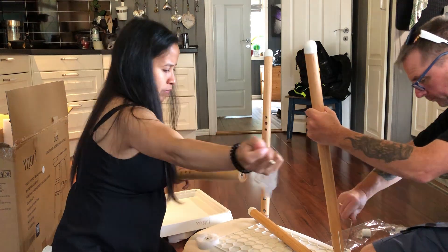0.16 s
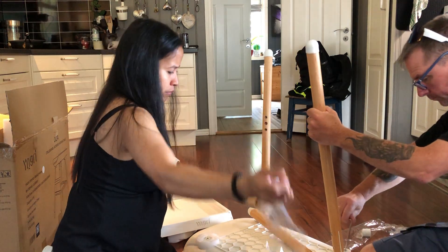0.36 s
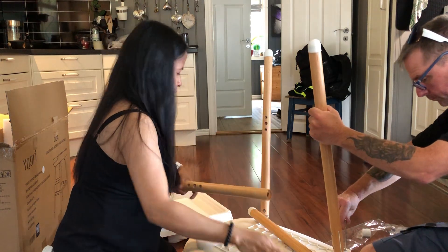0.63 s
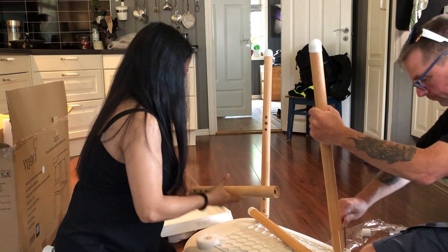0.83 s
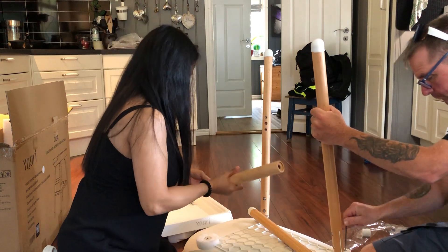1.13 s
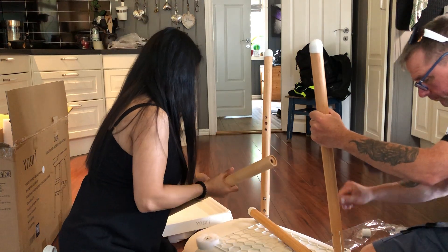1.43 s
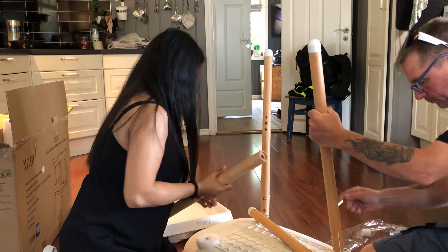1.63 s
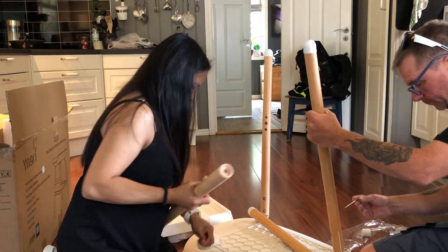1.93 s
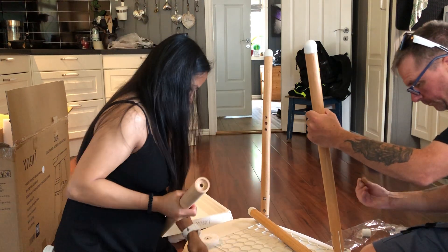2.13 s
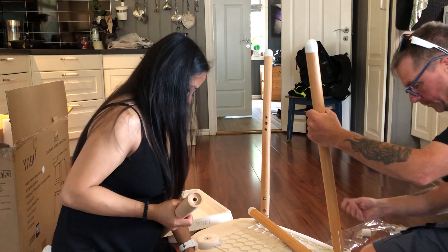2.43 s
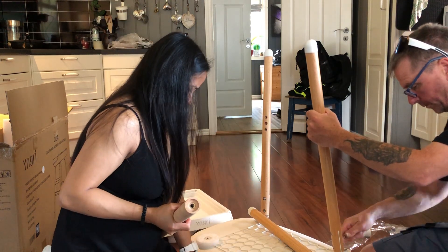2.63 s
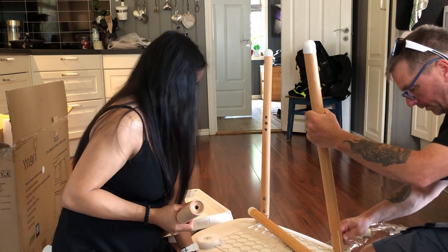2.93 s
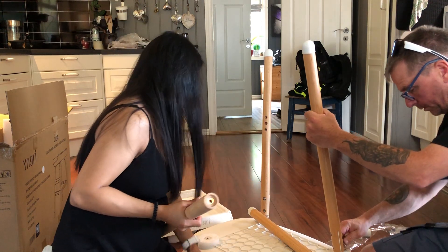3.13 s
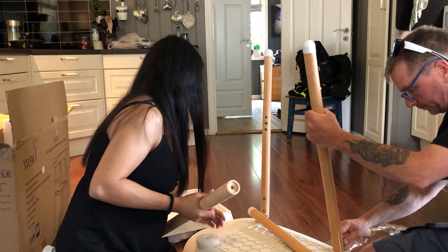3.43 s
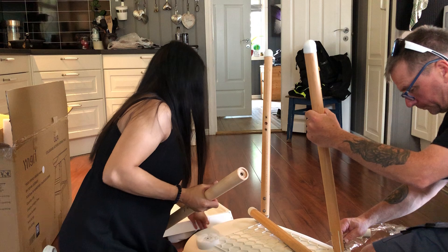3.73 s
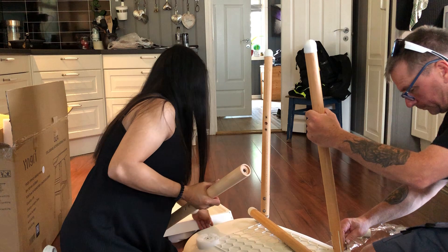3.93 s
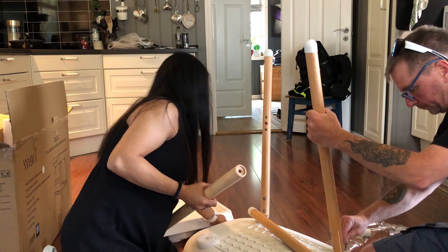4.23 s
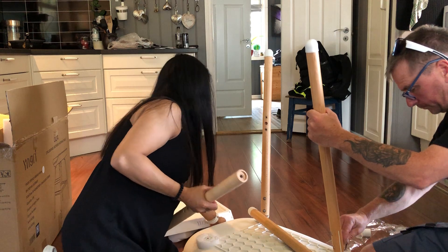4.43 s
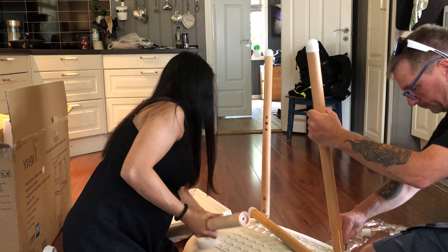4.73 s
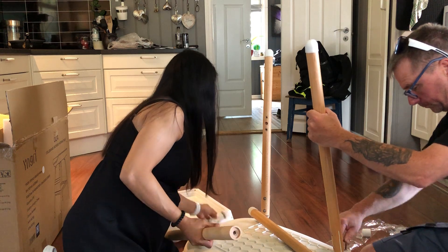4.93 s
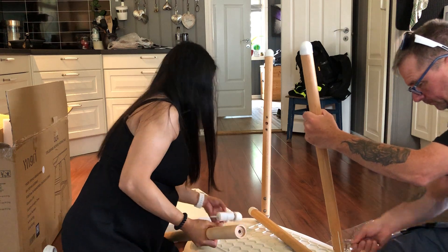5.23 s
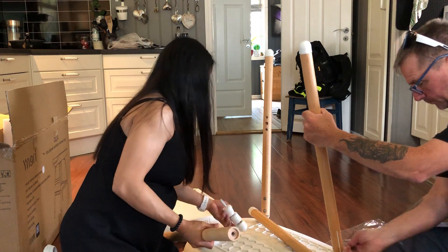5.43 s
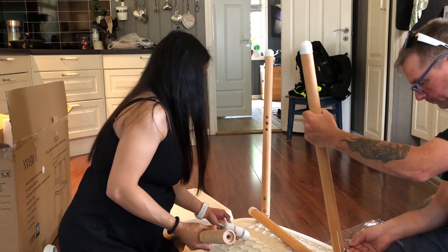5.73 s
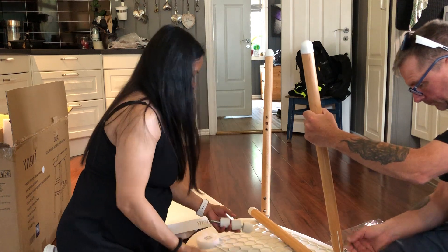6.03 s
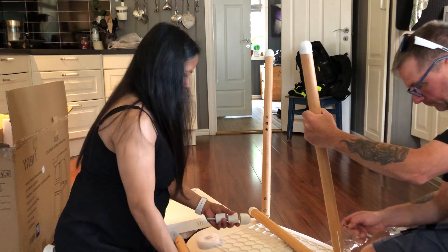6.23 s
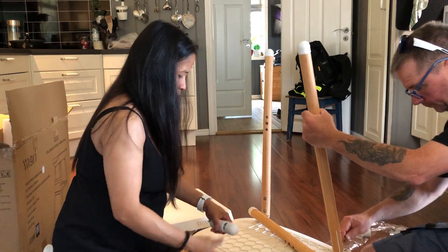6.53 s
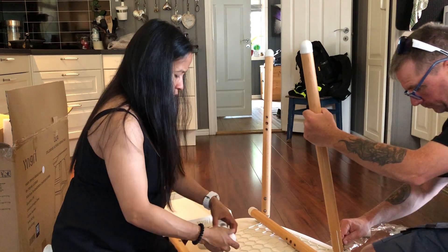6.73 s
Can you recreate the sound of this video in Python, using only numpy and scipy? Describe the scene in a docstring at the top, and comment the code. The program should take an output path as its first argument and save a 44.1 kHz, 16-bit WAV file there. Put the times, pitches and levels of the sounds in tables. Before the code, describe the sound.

A quiet kitchen with a very faint low hum and short, lively room reverberation, heard closely. From 0 to 0.9 seconds thin plastic wrap rustles brightly with dense sharp clicks and dry ticks, strongest in the first 0.6, as it is pulled off and dropped. From 1 to 2.5 only soft bumps and sparse small clicks remain. Between 2.4 and 3.2 little parts click in a quick cluster over faint film rustle. Hollow plastic caps tap in a tray at 3.4, 3.7 and 4.0. Near 4.4 a wooden rod knocks lightly and slides until about 4.8, with soft bumps. Small clicks continue; around 5.5 fingers briefly rub a cap, and a deep, dull bump lands at 5.6. A cap strikes the laminate floor loudly at 6.1, then bounces at 6.45, 6.63, 6.74 and 6.82, quickening and weakening among renewed film crackle and fine ticks.

```python
"""Film rustles at once and clicks as plastic wrap is pulled off and dropped in a quiet, faintly humming kitchen.
Soft bumps follow; plastic caps tap in a tray, a wooden rod knocks and slides, fingers rub a cap, and a cap
falls on the laminate floor and bounces. Clicks, ticks, taps and knocks are coloured noise bursts with echoes
and a room wash; bumps are sagging sines with rumble; rustle, slide and rub are streams of random snaps."""
import sys
import numpy as np
from scipy import signal
from scipy.fft import rfft, irfft, next_fast_len
from scipy.io import wavfile
from scipy.ndimage import map_coordinates

SR = 44100
rng = np.random.default_rng(int(sys.argv[2]) if len(sys.argv) > 2 else 0)


def generate_wav(sig):
    """Save sig (samples, or channels by samples) to the path in sys.argv[1] as 16-bit PCM at SR."""
    pcm = np.round(np.clip(np.atleast_2d(sig).T, -1, 1) * 32767).astype(np.int16)
    wavfile.write(sys.argv[1], SR, pcm)


N = 302967
TAIL = SR // 3  # samples of each impact and room answer


def amp(db):
    """Decibels to amplitude factor."""
    return 10 ** (np.asarray(db) / 20)


def unit(x):
    """Scale to RMS 1."""
    return x / np.sqrt(np.mean(x ** 2) + 1e-20)


def along(points, hz):
    """Interpolate (Hz, value) points on a log frequency axis."""
    f, v = np.transpose(points)
    return np.interp(np.log(hz + 1), np.log(f + 1), v)


def gain(*spans):
    """Level curves in dB as a gain per sample, silent outside their spans."""
    t = np.arange(N) / SR
    return sum(amp(np.interp(t, *np.transpose(rows), left=-200, right=-200)) for rows in spans)


def strokes(rows):
    """Each stroke sets in quickly, holds its level and fades."""
    t, attack_s = np.arange(N) / SR, 0.015
    track = np.zeros(N)
    for s, db, hold_s, fade_db_per_s in rows:
        attack = np.clip((t - s) / attack_s, 0, 1)
        track += attack * amp(db - fade_db_per_s * np.maximum(t - s - hold_s, 0))
    return track


def wobble(rate_hz):
    """Smooth random curve with rate_hz knots a second."""
    knots = rng.standard_normal(int(N * rate_hz / SR) + 4)
    return map_coordinates(knots, [np.arange(N) * rate_hz / SR])


def coloured(x, db_at):
    """Filter x with a gain in dB for each frequency."""
    m = next_fast_len(len(x) + 4096)
    return irfft(rfft(x, m) * amp(db_at(np.fft.rfftfreq(m, 1 / SR))), m)[:len(x)]


def causal(x, db_at):
    """Minimum-phase filter with this gain: nothing sounds before the blow."""
    m = 8192  # x is cut to this length
    log_gain = np.log(amp(db_at(np.fft.rfftfreq(m, 1 / SR))) + 1e-6)
    cepstrum = irfft(log_gain, m)
    cepstrum[1:m // 2] *= 2
    cepstrum[m // 2 + 1:] = 0
    return irfft(rfft(x, m) * np.exp(rfft(cepstrum)), m)


# Decay of the room. Each row: frequency in Hz, t60 in seconds.
ROOM_DECAY = [(100, 0.42), (300, 0.34), (1000, 0.43), (5000, 0.37), (13000, 0.28)]


def reverb(noise):
    """Noise of which each frequency dies at the room's own speed."""
    hz, t, z = signal.stft(noise, SR, nperseg=256)
    decay = amp(-60 * t / along(ROOM_DECAY, hz)[:, None])
    return signal.istft(z * decay, SR, nperseg=256)[1][:TAIL]


def in_room(x, wet_db):
    """A running sound plus the room's answer to it."""
    tail = reverb(rng.standard_normal(TAIL))
    tail = tail / np.linalg.norm(tail)
    delayed = np.pad(x, (150, 0))
    return x + amp(wet_db) * signal.fftconvolve(delayed, tail)[:N]


# First echoes, before random spread. Each row: delay in seconds, level in dB.
FIRST_ECHOES = [(.0018, -5.5), (.0065, -10), (0.014, -22), (0.016, -20.5), (.024, -38), (0.032, -27.5),
                (0.045, -32)]


def strike(db_at, crack_s, wet_db, fill_s, thin_hz=900):
    """A short coloured crack of peak 1, its first echoes and the room filling up behind it."""
    t, noise = np.arange(TAIL) / SR, rng.standard_normal((2, TAIL))
    noise[0, 0] = 4  # strong first contact
    # the bass builds up only in the room
    thin = lambda hz: db_at(hz) - 10 * np.log10(1 + (thin_hz / (hz + 1)) ** 2)
    crack = causal(noise[0] * amp(-60 * t / crack_s), thin)
    crack = np.pad(crack, (0, TAIL - len(crack))) / np.abs(crack).max()
    echoes = np.zeros(TAIL)
    for delay_s, db in FIRST_ECHOES:
        level = amp(db + rng.normal(0, 3))
        echoes += level * np.roll(crack, round(delay_s * rng.normal(1, .1) * SR))
    wash = (1 - np.exp(-t / fill_s)) * reverb(unit(coloured(noise[1], db_at)))
    return crack + echoes + amp(wet_db) * wash


def add(track, s, sound):
    """Mix a sound in at s seconds."""
    track[round(s * SR):][:len(sound)] += sound


def grains(per_s, spread_db, clump_db):
    """Random tiny snaps, a few of them large, coming in clumps."""
    draw = rng.random((3, N))
    size = amp(-spread_db * np.log(draw[1] + 0.0047) + clump_db * wobble(40))
    return unit((draw[0] < per_s / SR) * size * np.sign(draw[2] - .5))


# Handling of the film, one list per span. Each row: time in seconds, rustle in dB.
RUSTLE_LEVELS = [
    [(0.0, -39.5), (0.112, -55), (0.522, -48.5), (0.79, -58), (0.964, -91)],
    [(1.35, -68), (1.43, -68), (1.5, -108)],
    [(2.4, -71), (2.5, -68.5), (2.872, -62), (2.992, -63.5), (3.35, -88)],
    [(6.0, -69), (6.25, -57.5), (6.318, -61.5), (6.44, -45), (6.56, -54), (6.65, -52), (6.87, -52)],
]
# Colour of the film. Each row: frequency in Hz, gain in dB.
FILM_COLOUR = [(88, -43), (150, 14), (348, -1), (457, 5.5), (589, -20), (689, -7), (3100, 2), (15100, -12),
               (16000, -3.5)]
# Large to tiny folds. Each row: centre in Hz, level in dB.
FOLD_SIZES = [(900, 5.5), (3500, 1), (8000, 1), (13000, 2.5)]


def film():
    """Thin film buckles in many creases; each size of fold snaps in its own band."""
    crackle = np.zeros(N)
    for fold_hz, db in FOLD_SIZES:
        band = lambda hz: along(FILM_COLOUR, hz) - 14 * np.log((hz + 1) / fold_hz) ** 2
        crackle += amp(db) * coloured(grains(300, spread_db=4, clump_db=3.0), band)
    return in_room(gain(*RUSTLE_LEVELS) * unit(crackle), wet_db=-1.0)


# Colour of the room tone. Each row: frequency in Hz, gain in dB.
HUSH_COLOUR = [(18, -37), (30, 2), (53, -2), (210, -0.5), (295, -2.5), (364, -3.5), (988, -9.5),
               (1910, -17.5), (6900, -20.5), (12300, -23), (14800, -23), (16000, -14)]
HUM_HZ = 50


def room_tone():
    """Faint noise that drifts a little, and a mains hum sine."""
    hush = unit(coloured(rng.standard_normal(N), lambda hz: along(HUSH_COLOUR, hz)))
    hum = np.sin(2 * np.pi * HUM_HZ * np.arange(N) / SR)
    drift_db = 1.0 * wobble(3.9) + 0.13 * wobble(14.0)
    return amp(-67 + drift_db) * hush + amp(-65.5) * hum


# Creases of the wrap and small parts clicking. Each row: start in seconds, crack peak in dB,
# ring in Hz, body in dB, air in dB, wash under the crack in dB.
CLICK_EVENTS = [(.0034, -20, 3250, -16, -10.5, -12.5), (0.1164, -9.5, 3640, -23.5, -20, -22.5),
                (0.1226, -11.5, 3160, -13.5, -9, -18), (.1519, -10.5, 6550, -29, -11, -23),
                (0.2068, -29, 4650, -37, -21, -16), (.325, -23, 8300, -27, -18.5, -17.5),
                (0.3471, -20, 6150, -21, -11.5, -14.5), (0.4081, -25, 5270, -14.5, -10, -14),
                (0.4686, -19, 4150, -19, -17.5, -20), (0.537, -27.5, 2920, -25, -2, -12),
                (0.5577, -22.5, 3920, -24, -14.5, -15), (0.5877, -18, 2920, -23.5, -16, -11.5),
                (0.6118, -13, 10800, -19.5, -24.5, -24.5), (.781, -30.5, 4440, -22, -14, -19.5),
                (0.8122, -26.5, 3300, -22, -18, -14.5), (0.8852, -37, 3730, -8.5, -24, -16),
                (.946, -37.5, 3760, -33, -19, -24.5), (1.2331, -56, 2870, -5, -42, -9),
                (1.348, -45.5, 1000, 4, -29, -12.5), (1.5346, -46, 2670, -12, -17, -24),
                (1.556, -32, 3350, -14.5, -12.5, -23), (1.7958, -49.5, 2300, -1, -15, -16.5),
                (1.952, -27, 14100, -16.5, -13.5, -19.5), (2.0597, -31.5, 6640, -10, -15.5, -25),
                (2.363, -49.5, 5700, -30, -15, -25), (2.4334, -31, 4800, -15, -18, -24.5),
                (2.5916, -43.5, 6100, -3, -25, -14.5), (2.673, -24, 3530, 2, -16.5, -25),
                (2.76, -46.5, 1595, -1, -17, -9), (2.791, -34.5, 2440, -12, -22, -13.5),
                (2.826, -25, 2270, -11.5, -15, -18.5), (2.8932, -25, 3340, -13.5, -24.5, -23.5),
                (2.9258, -29, 4640, -6.5, -13, -20.5), (2.9493, -37, 1680, -0.5, -26, -19.5),
                (3.0016, -41, 4150, -28, -24, -23), (3.019, -31.5, 1570, -5, -18.5, -20),
                (3.0392, -32.5, 6800, -8, -20, -19.5), (3.0757, -34, 3840, -18, -12, -23),
                (3.141, -31.5, 6840, -3, -11.5, -22.5), (3.2495, -54.5, 1540, -19, -21, -6),
                (4.1812, -41, 7100, -1, -12, -21), (4.2279, -26, 7700, -12.5, -14.5, -25),
                (4.31, -46, 2540, -5, -32, -14.5), (4.4467, -43.5, 1630, -9, -44, -5),
                (4.6426, -45, 1510, -7, -17, -14.5), (4.9127, -48, 4260, -12, -29.5, -18.5),
                (5.1278, -49.5, 2250, -10, -29, -16.5), (5.312, -30, 6200, -14, -12, -20.5),
                (5.3429, -38, 1700, -17.5, -66, -11.5), (5.4657, -46, 2060, -7, -48, -12.5),
                (5.5899, -46.5, 2210, -21, -43, -9.5), (6.0086, -37, 3930, -9, -18, -12.5),
                (6.2878, -29, 2830, -16, -23.5, -22.5), (6.328, -23, 5640, -5.5, -10, -24)]
RING_DB, RING_PER_AIR_DB = 1, -0.19  # hump at the ring; dull clicks ring more


def clicks():
    """Each click is broad, with a hump at its ring, some body, some air and a ragged colour of its own."""
    track = np.zeros(N + SR)
    for s, db, ring_hz, body_db, air_db, wet_db in CLICK_EVENTS:
        slope = [(120, body_db - 9), (700, body_db), (1300, body_db / 2 - 6.5),
                 (2000, -16.5), (3200, -15), (12000, air_db)]
        ragged_db = 2.5 * rng.standard_normal(size=18)  # one knot per kHz
        ring_db = RING_DB + RING_PER_AIR_DB * air_db
        hump = lambda hz: ring_db * np.exp(-(np.log((hz + 1) / ring_hz) / 0.19) ** 2)
        ragged = lambda hz: np.interp(hz / 1000, np.arange(len(ragged_db)), ragged_db)
        colour = lambda hz: along(slope, hz) + hump(hz) + ragged(hz)
        add(track, s, amp(db) * strike(colour, crack_s=0.0075, wet_db=wet_db, fill_s=0.00011))
    return track[:N]


# Thin dry ticks of the smallest folds. Each row: start in seconds, crack peak in dB, pitch in Hz.
TICK_EVENTS = [(0.198, -19, 13000), (0.2403, -24, 6200), (0.2574, -23, 13100), (0.2837, -26, 14000),
               (0.312, -23, 11900), (0.38, -21.5, 6370), (0.4886, -24.5, 6500), (0.6294, -27, 7310),
               (1.11, -58.5, 5940), (1.271, -60, 6000), (1.42, -50, 12500), (1.615, -48, 14000),
               (2.4465, -40.5, 8950), (2.652, -42, 4500), (2.6658, -32.5, 6000), (2.806, -36, 11100),
               (2.9325, -42, 5000), (3.128, -50, 5000), (3.585, -43, 7000), (4.065, -56, 6500),
               (5.621, -47.5, 3800), (6.37, -34, 11860), (6.592, -31, 12500), (6.72, -25, 14600),
               (6.734, -28.5, 11800), (6.783, -28, 13200), (6.801, -24, 12000), (6.816, -26, 13000)]


def ticks():
    """A tiny fold snaps very briefly and hardly wakes the room."""
    track = np.zeros(N + SR)
    for s, db, pitch_hz in TICK_EVENTS:
        colour = lambda hz: -18 * np.log((hz + 1) / pitch_hz) ** 2
        add(track, s, amp(db) * strike(colour, crack_s=0.0035, wet_db=-19.5, fill_s=0.0057))
    return track[:N]


# Floor and room modes, before random spread. Each row: frequency in Hz, level in dB, t60 in seconds.
FLOOR_MODES = [(78.6, 3, 0.15), (110.5, -17.5, 0.56), (144.6, 6.5, 0.32), (169.4, -7.5, 0.35),
               (228.2, 2, 0.31), (311.5, -3.5, 0.38), (410, 0.5, 0.13), (444.6, 11.5, 0.065),
               (540.4, 4, 0.14), (560, -24, 0.15), (828, -21, 0.31), (963, -9, 0.19), (1070, -28, 0.9)]


def boards(db_at):
    """The floor and room modes as decaying sines, rung at new strengths."""
    t, ring = np.arange(TAIL) / SR, np.zeros(TAIL)
    for hz, level_db, t60_s in FLOOR_MODES:
        decay = amp(level_db + db_at(hz) + rng.normal(0, 1.53) - 60 * t / t60_s)
        ring += decay * np.sin(2 * np.pi * hz * rng.normal(1, 0.019) * t)
    return ring


# Soft bumps of knees and rod ends. Each row: start in seconds, level in dB, strongest pitch in Hz.
THUD_EVENTS = [(0.472, -41.5, 353), (0.609, -50.5, 185), (.89, -54, 842), (1.272, -52.5, 395),
               (1.345, -42.5, 348), (4.62, -38.5, 369), (4.733, -41.5, 147), (4.79, -45.5, 128),
               (5.108, -49, 142), (5.38, -56, 129), (5.624, -18.5, 102), (5.86, -52.5, 305),
               (5.913, -48, 149), (6.01, -47, 250)]
FALL_DB_PER_OCT, RISE_DB_PER_OCT = 11, 4  # above and below the strongest pitch
SAG_S, SAG_FROM = 0.0195, 1.3  # the push sags onto its pitch from this ratio above


def thuds():
    """A soft contact lasts long, so it passes mostly bass and swells in."""
    track, t = np.zeros(N + SR), np.arange(TAIL) / SR
    for s, db, strongest_hz in THUD_EVENTS:
        octaves = lambda hz: np.log2((hz + 1) / strongest_hz)
        soft = lambda hz: -np.maximum(FALL_DB_PER_OCT * octaves(hz), -RISE_DB_PER_OCT * octaves(hz))
        rumble = reverb(unit(coloured(rng.standard_normal(TAIL), soft)))
        turns = strongest_hz * (t + (SAG_FROM - 1) * SAG_S * (1 - np.exp(-t / SAG_S)))
        push = amp(-6 - 60 * t / 0.13) * np.sin(2 * np.pi * turns)
        swell = 1 - np.exp(-t / 0.0039)
        add(track, s, amp(db) * swell * (amp(-13) * rumble + amp(-10.5) * boards(soft) + push))
    return track[:N]


# Plastic caps tapping in the tray. Each row: start in seconds, crack peak in dB.
TAP_EVENTS = [(3.385, -23.5), (3.4352, -71), (3.5572, -42.5), (3.68, -65), (3.7342, -24), (3.9684, -27),
              (4.0258, -45)]
# Resonances of caps and tray. Each row: centre in Hz, width in Hz, level in dB before random spread.
CAP_MODES = [(302, 210, 9), (983, 230, 8.5), (2750, 580, 3), (3840, 640, 5), (6100, 2000, -2.5),
             (6850, 720, -2), (10100, 3900, -1), (13300, 2000, 0)]
TAP_BODY_DB = 2.5
TAP_AIR_DB, AIR_PER_DB = 13.5, 0.53  # air of a full-scale tap; glancing taps are duller
TAP_ROOM_DB, ROOM_PER_DB = -39.5, -0.74  # glancing taps have less crack over their wash


def taps():
    """Every tap wakes the same resonances at new strengths."""
    track = np.zeros(N + SR)
    for s, db in TAP_EVENTS:
        slope = [(1200, TAP_BODY_DB), (2500, 0), (6000, 0), (12000, TAP_AIR_DB + AIR_PER_DB * db)]
        modes = [(hz, width_hz, level_db + rng.normal(0, 2.5)) for hz, width_hz, level_db in CAP_MODES]
        power = lambda f: sum(amp(2 * g) / (1 + (2 * (f - c) / w) ** 2) for c, w, g in modes)
        colour = lambda f: along(slope, f) + 10 * np.log10(power(f))
        wet_db = TAP_ROOM_DB + ROOM_PER_DB * db
        add(track, s, amp(db) * strike(colour, crack_s=0.0065, wet_db=wet_db, fill_s=0.0014))
    return track[:N]


# Hard blows on the floor boards. Each row: start in seconds, crack peak in dB, thump in dB, tick in dB.
KNOCK_EVENTS = [(4.38, -31, 1.5, -44), (6.126, -9, 8.5, -20.5), (6.454, -4, -1, -12),
                (6.627, -6.5, 1, -12.5), (6.742, -11, -2, -21), (6.824, -15.5, -1, -30)]
# Colour of a blow's noise. Each row: frequency in Hz, gain in dB.
BLOW_COLOUR = [(47, -11), (80, -22), (139, 8.5), (242, -7.5), (386, -9), (563, -6.5), (657, -11.5),
               (802, -10.5), (958, -12.5), (1090, -13.5), (1700, -18), (1900, -21.5), (3620, -16),
               (16000, -50)]
BOOM_DB, KNOCK_ROOM_DB = -14, -11  # deepest bass under the thump, room under the crack
HARD_DB, HARD_PER_DB = -3, 0.46  # treble of a full-scale blow; weaker blows are duller


def knocks():
    """A hard contact gives a tick, a crack, the room behind it and the ringing boards."""
    track, t = np.zeros(N + SR), np.arange(TAIL) / SR
    tick_colour = [(800, -11), (3500, 5.5), (7000, 7.0), (14000, -6.0)]
    for s, db, thump_db, tick_db in KNOCK_EVENTS:
        hard_db = HARD_DB + HARD_PER_DB * db
        contact = [(150, thump_db + BOOM_DB), (270, thump_db), (480, 0), (1200, 0.048 * hard_db), (3500, hard_db)]
        ring = boards(lambda hz: along(contact, hz)) * (1 - np.exp(-t / 0.0048))
        blow = strike(lambda hz: along(BLOW_COLOUR, hz) + along(contact, hz),
                      crack_s=0.029, wet_db=KNOCK_ROOM_DB, fill_s=0.0084, thin_hz=300)
        tick = strike(lambda hz: along(tick_colour, hz), crack_s=0.0059, wet_db=-11.5, fill_s=0.0023)
        add(track, s, amp(db) * (blow + amp(tick_db) * tick + amp(-15.5) * ring))
    return track[:N]


# A rod jerks loose, then drags in the tray.
# Each row: start in seconds, level in dB, hold in seconds, fade in dB per second.
ROD_STROKES = [(4.385, -44, 0.025, 205), (4.47, -57, 0.29, 193)]
# Colour of the tray. Each row: frequency in Hz, gain in dB.
TRAY_COLOUR = [(53, -25), (90, 0), (138, 3), (301, 2), (362, -5), (1290, -3.5), (2150, -15.5),
               (3240, -13.5), (12000, -41.5), (15600, -66), (22000, -120)]


def rod():
    """Wood judders over moulded plastic: dense clumped snaps in the tray's colour."""
    snaps = grains(700, spread_db=2.5, clump_db=5)
    judder = unit(coloured(snaps, lambda hz: along(TRAY_COLOUR, hz)))
    return in_room(strokes(ROD_STROKES) * judder, wet_db=0.5)


# Fingers rubbing a cap. Each row: start in seconds, level in dB, hold in seconds, fade in dB per second.
RUB_STROKES = [(5.46, -62.5, 0.023, 130), (5.575, -57.5, 0.08, 156)]
# Colour of skin on plastic. Each row: frequency in Hz, gain in dB.
SKIN_COLOUR = [(350, -35), (600, -14), (1140, -2), (2230, -11.5), (3020, -18.5), (7020, -39), (8000, -33.5),
               (10400, -63), (17600, -120)]


def rub():
    """Skin slips over hollow plastic in very dense tiny snaps."""
    snaps = grains(3000, spread_db=3.5, clump_db=6)
    slips = unit(coloured(snaps, lambda hz: along(SKIN_COLOUR, hz)))
    return in_room(strokes(RUB_STROKES) * slips, wet_db=-1.5)


def scene():
    """All sources sum at one microphone."""
    handling = film() + clicks() + ticks() + thuds()
    tray_and_floor = taps() + knocks() + rod() + rub()
    return (handling + tray_and_floor + room_tone())[None]


LOW_HZ, TOP_HZ = 66.5, 15800


def record(dry):
    """The microphone drops the deep bass; a steep band limit removes the top treble."""
    high_pass = signal.butter(4, LOW_HZ, "highpass", fs=SR, output="sos")
    heard = signal.sosfilt(high_pass, dry[0])
    return coloured(heard, lambda hz: -120. * (hz > TOP_HZ))[None]


dry = scene()
out = record(dry)
generate_wav(out)
```